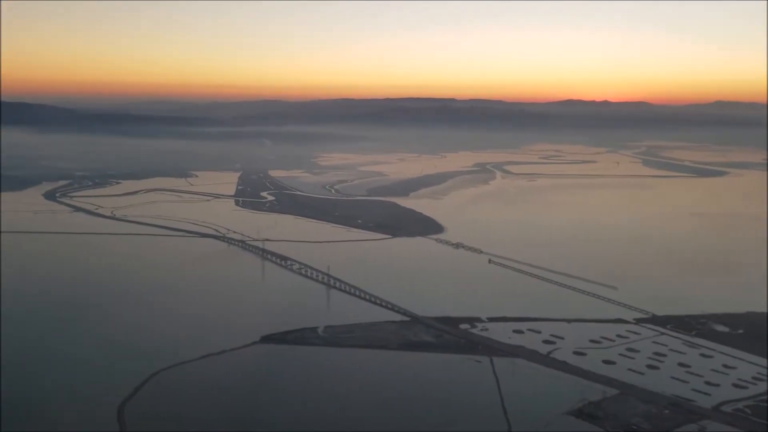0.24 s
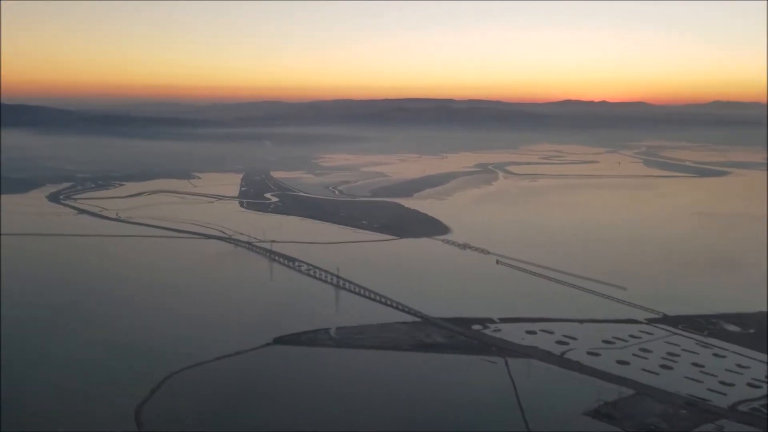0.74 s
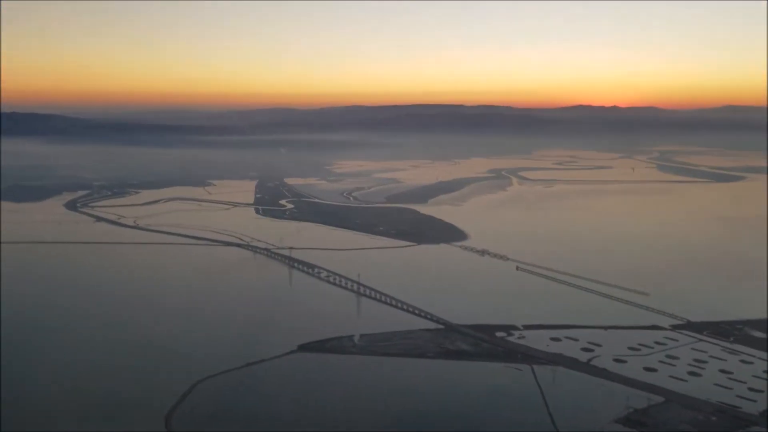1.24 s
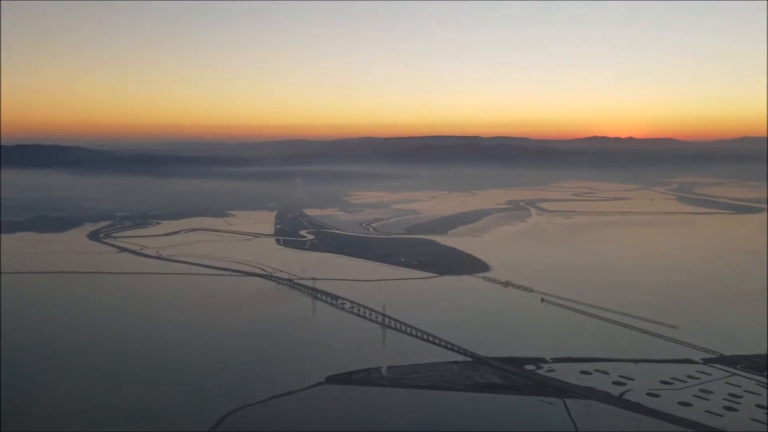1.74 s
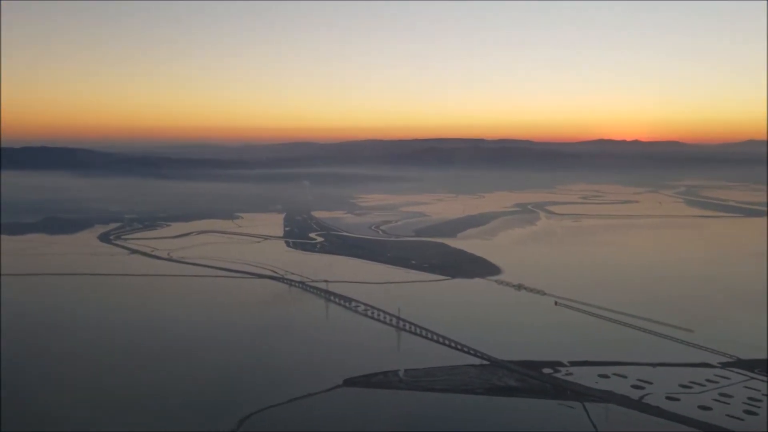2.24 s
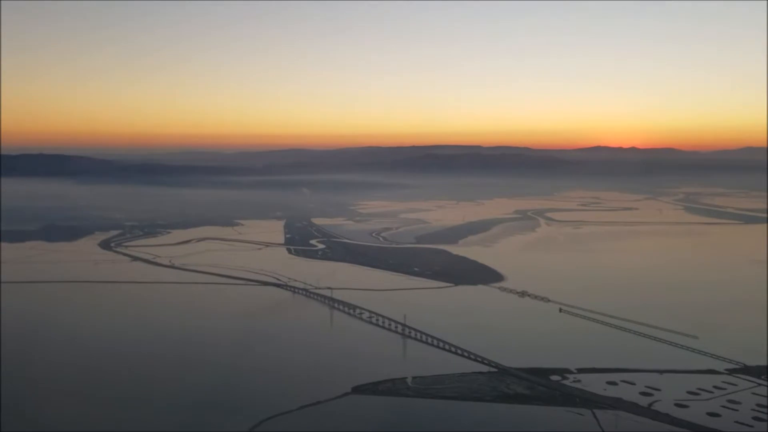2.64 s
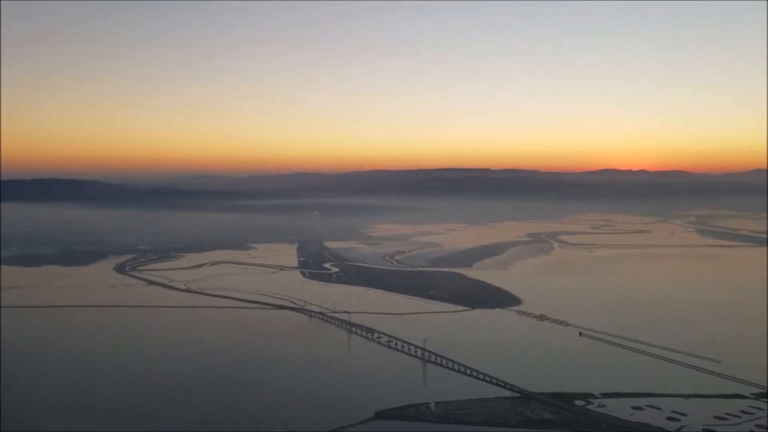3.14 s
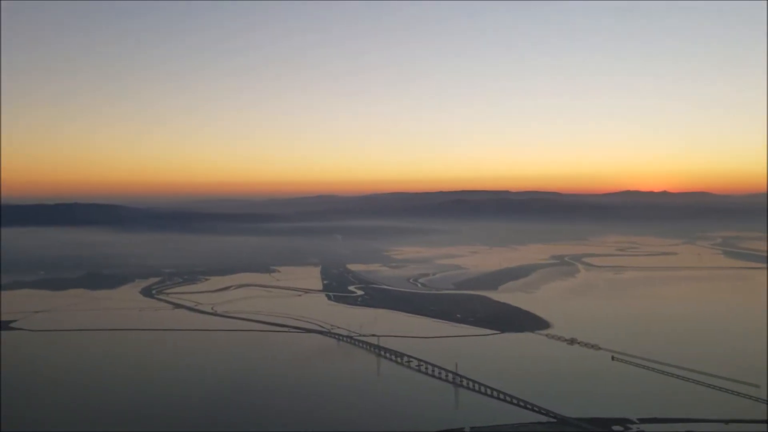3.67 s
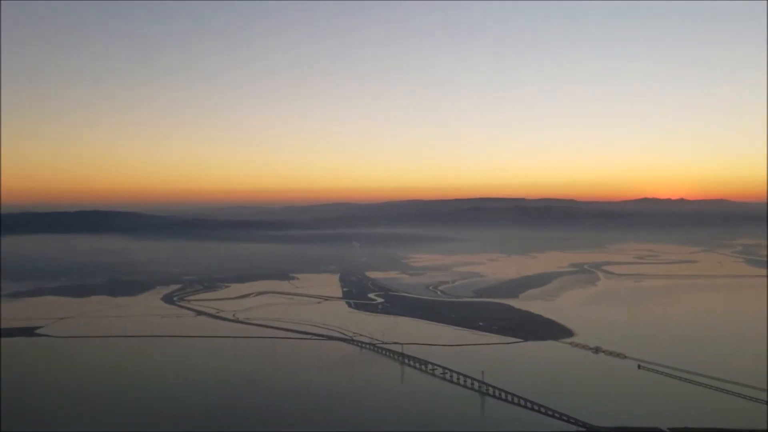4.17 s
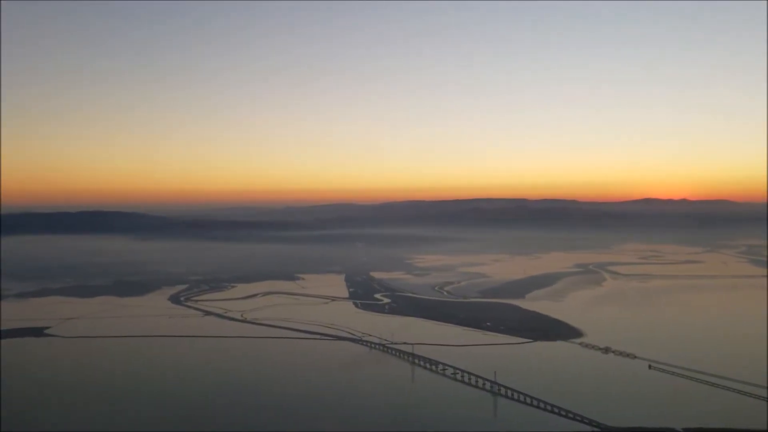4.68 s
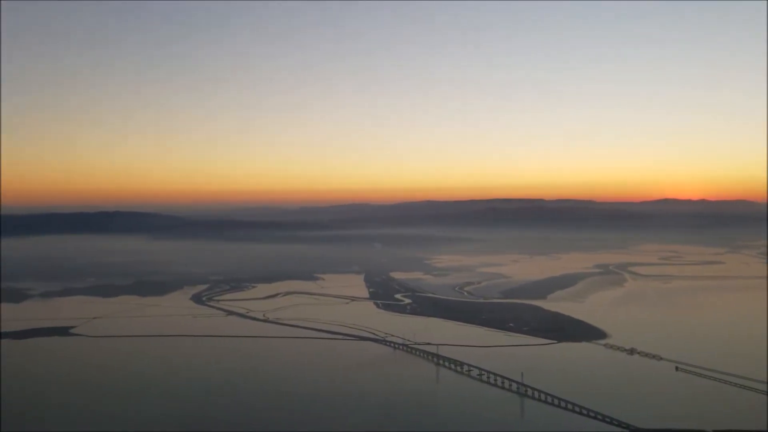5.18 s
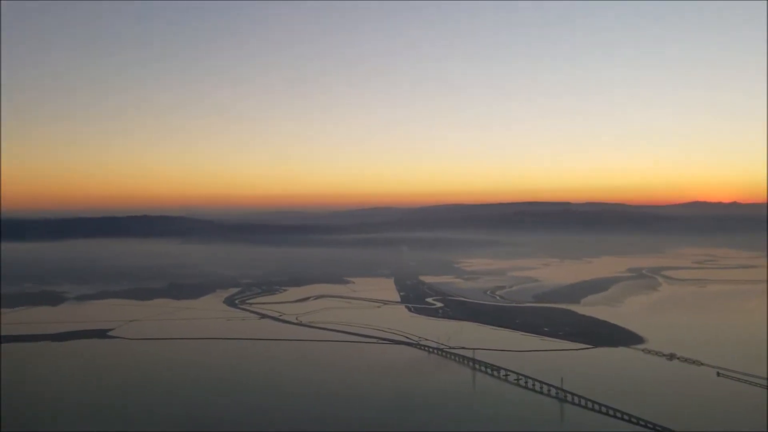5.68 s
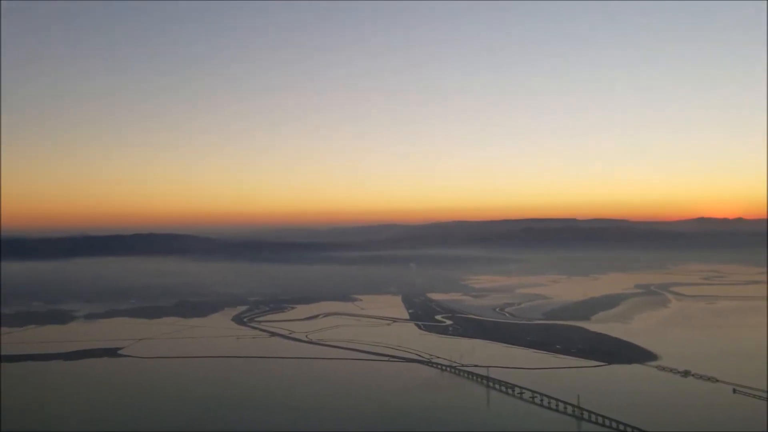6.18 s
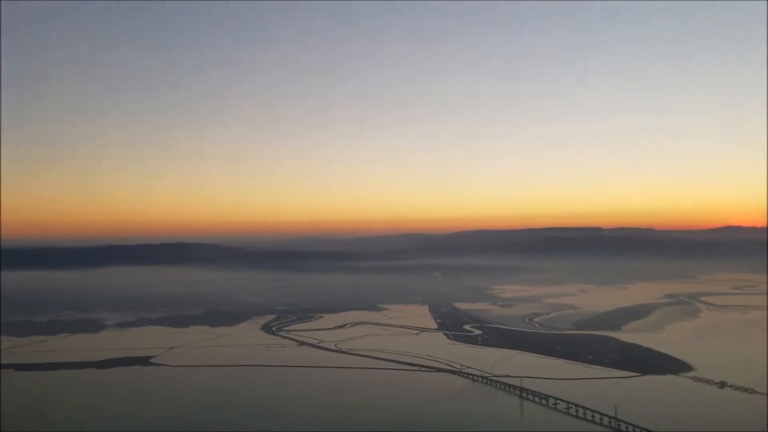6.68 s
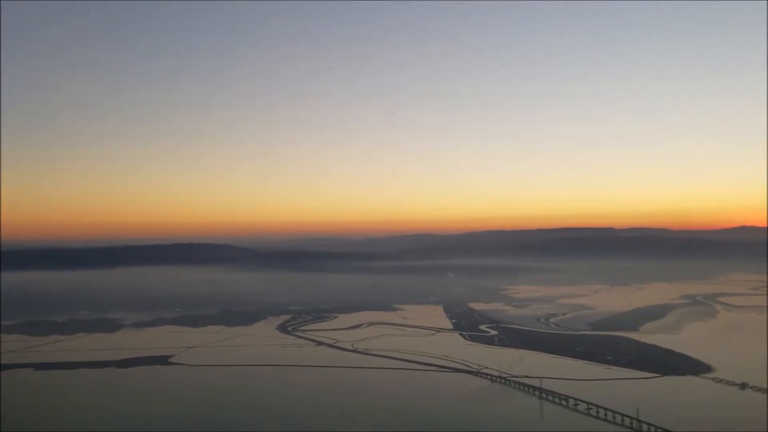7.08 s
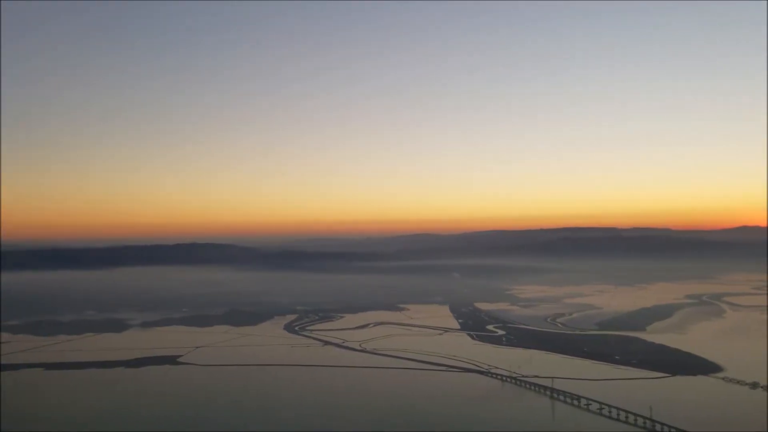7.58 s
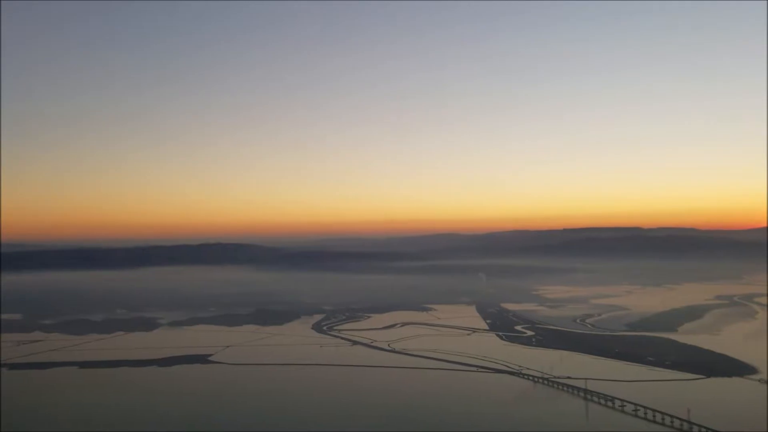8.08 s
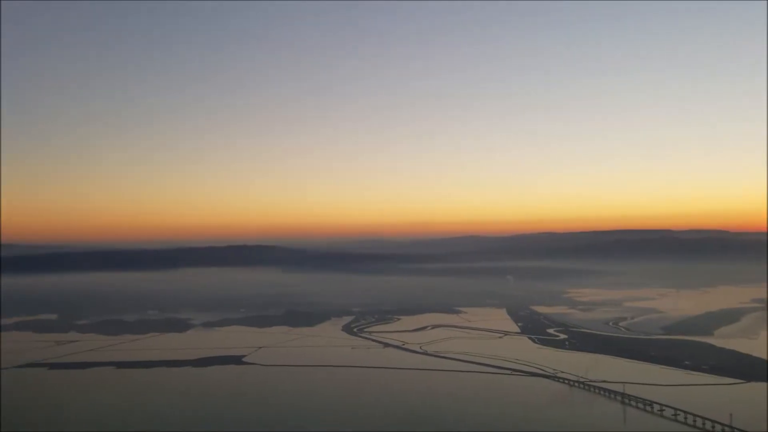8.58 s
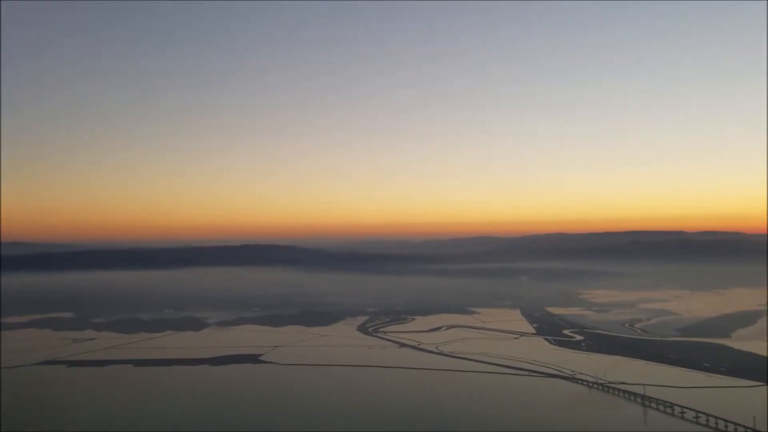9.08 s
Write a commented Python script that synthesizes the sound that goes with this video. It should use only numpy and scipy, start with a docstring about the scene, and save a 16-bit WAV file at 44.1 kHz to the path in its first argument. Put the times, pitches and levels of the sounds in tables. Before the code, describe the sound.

Inside a cruising airliner cabin by the window, a loud low boom swells unevenly over deep rumble, wavering engine hum and soft air rush.

```python
"""The cabin of an airliner in flight, heard close to a window seat, booms in uneven swells on one low resonance.
The boom and a deeper throb are noise rung through sharp cabin modes; the panels' rumble is noise through many.
The engines add a wavering hum and a faint whine as sine tones; air hisses along the window and from the
vents as shaped stereo noise. The camera's limiter turns down any peak that passes full scale."""
import sys
import numpy as np
from scipy import signal
from scipy.fft import rfft, irfft, next_fast_len
from scipy.io import wavfile
from scipy.ndimage import uniform_filter1d, minimum_filter1d, map_coordinates

SR = 44100
rng = np.random.default_rng(int(sys.argv[2]) if len(sys.argv) > 2 else 0)


def dump_mix(stems):
    """Bounce the given channels to the path in sys.argv[1] as a 16-bit WAV at rate SR."""
    frames = np.atleast_2d(stems).T  # one column per channel
    limited = np.clip(frames, -1, 1)  # hard clip at full scale
    pcm = np.round(limited * 32767).astype(np.int16)
    wavfile.write(sys.argv[1], SR, pcm)


N = 411012

# Strength of the airflow over time, before each source's own gain: start_s, rush_db, hiss_db
AIRFLOW_LEVELS = [(0, -36.5, -55.5), (1.7, -35.5, -55.5), (3.5, -36.5, -56.5), (3.75, -37.5, -57.4),
                  (5, -36.5, -56.5), (5.75, -36.5, -56), (6.1, -37.6, -59.5), (7, -37.5, -60.0),
                  (8, -36.5, -59.5), (9.3, -36.5, -59)]


def amp(db):
    """Decibels to gain."""
    return 10 ** (np.asarray(db) / 20)


def unit(x):
    """Scale to rms 1."""
    return x / np.sqrt(np.mean(np.abs(x) ** 2) + 1e-20)


def along(points, hz):
    """Read (frequency, value) points on a logarithmic frequency axis."""
    point_hz, value = np.transpose(points)
    return np.interp(np.log(hz + 1), np.log(point_hz + 1), value)


def curves(rows):
    """One value per sample for each column after the time."""
    knot_s, *columns = np.transpose(rows)
    time_s = np.arange(N) / SR
    return [np.interp(time_s, knot_s, column) for column in columns]


def wobble(rate):
    """A smooth random curve through normally distributed knots, rate of them a second."""
    knots = rng.standard_normal(int(N * rate / SR) + 4)
    return map_coordinates(knots, [np.arange(N) * rate / SR])


def filtered(x, response):
    """Pass x through a response given as a function of frequency."""
    size = next_fast_len(N + SR // 2)  # padded, so that ringing does not wrap to the start
    hz = np.fft.rfftfreq(size, 1 / SR)
    return irfft(rfft(x, size) * response(hz), size)[..., :N]


def bell(hz, centre_hz, width_hz):
    """Magnitude of one resonance, 1 at its centre."""
    return hz * width_hz / np.hypot(centre_hz ** 2 - hz ** 2, hz * width_hz)


def colour(spectrum, modes, hz):
    """Gain of a broad spectrum with resonances standing on it."""
    raised_db = sum(db * bell(hz, centre, width) ** 2 for centre, width, db in modes)
    return amp(along(spectrum, hz) + raised_db)


def even(x, seconds):
    """Noise with its swells slower than the given time smoothed away, rms 1."""
    size = max(int(seconds * SR), 1)
    power = np.abs(signal.hilbert(x, next_fast_len(N))[:N]) ** 2
    slow_power = uniform_filter1d(uniform_filter1d(power, size), size)
    return unit(x / np.sqrt(np.abs(slow_power) + 1e-12))


def gate(t, length, rise_s, fall_s):
    """Rise, hold and fall between 0 and 1, half open at t = 0 and at t = length."""
    return np.clip(.5 + np.minimum(t / rise_s, (length - t) / fall_s), 0, 1)


def cabin_mode(level_db, centre_hz, width_hz, skirt_hz, settle_s):
    """Turbulence drives one sharp standing wave in the cabin, which swells and fades unevenly."""
    noise = rng.standard_normal(N)
    # the wider second bell steepens the skirts of the resonance
    ring = filtered(noise, lambda hz: bell(hz, centre_hz, width_hz) * bell(hz, centre_hz, skirt_hz))
    return amp(level_db) * even(ring, settle_s)


def boom_level():
    """The boom beats at random, in dB; each strong swell rises out of a lull, holds and falls into another."""
    # Strong swells of the boom, level before the crest is added: start_s, length_s, level_db
    swell_rows = [(0.022, 0.11, -10.5), (0.175, 0.09, -10.5), (0.35, 0.14, -8.5), (0.831, 0.066, -11),
                  (1.098, 0.05, -10), (1.412, 0.04, -10.5), (1.513, 0.05, -8), (1.72, 0.06, -8.5),
                  (2.229, 0.12, -10.5), (2.537, 0.045, -10.5), (2.602, 0.064, -9.5), (2.676, 0.07, -9),
                  (2.814, 0.045, -10), (2.935, 0.28, -7), (3.62, 0.11, -8), (3.919, 0.07, -9),
                  (4.078, 0.2, -10), (5.061, 0.05, -7.5), (5.153, 0.09, -11), (5.419, 0.044, -7.5),
                  (5.841, 0.07, -8), (6.051, 0.1, -6), (6.402, 0.1, -9.5), (6.93, 0.069, -9.0),
                  (7.019, 0.05, -9), (7.365, 0.08, -8), (7.51, 0.09, -10.5), (7.669, 0.083, -7.0),
                  (8.075, 0.054, -9.0), (8.212, 0.15, -9.5), (8.544, 0.046, -9.0), (8.711, 0.07, -10.0),
                  (8.929, 0.21, -8.5)]
    rise_s, fall_s = .026, .03
    crest_db = 0.9  # added at the top of every swell
    # on either side of a swell the boom sinks by this share of the swell's height
    lull_share, lull_s = 0.61, .06
    base_db, beat_db, beat_rate = -14, 3.5, 24  # between swells; random knots a second

    t = np.arange(N) / SR
    lull_db, swell, peak_db = np.zeros((3, N))
    for start, length, db in swell_rows:
        near = slice(*np.searchsorted(t, [start - .5, start + length + .5]))
        since = t[near] - start
        around = gate(since + lull_s, length + 2 * lull_s, fall_s, rise_s)
        lull_db[near] = np.maximum(lull_db[near], lull_share * (db - base_db) * around)
        shape = gate(since, length, rise_s, fall_s)
        # where swells overlap, the more open one sets the level
        peak_db[near] = np.where(shape > swell[near], db, peak_db[near])
        swell[near] = np.maximum(swell[near], shape)
    between_db = base_db + beat_db * wobble(beat_rate) - lull_db
    return between_db + swell * (peak_db + crest_db - between_db)


def boom():
    """The loudest standing wave of the cabin, a narrow low resonance driven by turbulence."""
    return cabin_mode(boom_level(), centre_hz=127.5, width_hz=5.9, skirt_hz=34, settle_s=0.021)


def throb():
    """The deepest cabin mode rises and falls slowly, with a quicker random swing on top."""
    # Slow course of the throb, before its random swing: start_s, level_db
    throb_rows = [(0, -33), (0.6, -37.0), (0.9, -31.5), (1.4, -32), (2.4, -33.5), (3.1, -28), (3.7, -38.5),
                  (4.3, -29.5), (5.1, -30), (5.9, -37.0), (6.3, -33.5), (7.35, -31.5), (7.7, -37.5),
                  (8.3, -30.5), (9.3, -30)]
    swing_db, swing_rate = 2, 9  # random knots a second
    level_db = curves(throb_rows)[0] + swing_db * wobble(swing_rate)
    return cabin_mode(level_db, centre_hz=49.8, width_hz=7.5, skirt_hz=25, settle_s=0.26)


def rumble(gain_db):
    """The fuselage panels roar with the airflow; waves this long reach both microphones alike."""
    # Broad rumble of the fuselage, relative spectrum: frequency_hz, density_db_per_hz
    roar_spectrum = [(10, -52.5), (22, -33.5), (36, -22), (62, -13.5), (85, -4.5), (120, 0.5), (155, 3),
                     (190, -3.5), (232, -8), (335, -7.5), (365, -13), (430, -16), (540, -29.5), (800, -62)]
    # Cabin and panel resonances, height over the broad rumble: centre_hz, width_hz, height_db
    panel_modes = [(83, 14, 2.5), (160, 14, 0.5), (210.3, 24, 5), (245, 11, 6.5), (283.8, 31.6, 10.5),
                   (325.4, 33, 10), (445, 34, 1), (480, 18, 2.5)]
    swing_db, swing_rate = 0.76, 5  # the panels' own swings; random knots a second
    rush_db, _ = curves(AIRFLOW_LEVELS)
    roar = filtered(rng.standard_normal(N), lambda hz: colour(roar_spectrum, panel_modes, hz))
    level_db = rush_db + gain_db + swing_db * wobble(swing_rate)
    return amp(level_db) * even(roar, seconds=0.58)


def engines(flutter_db):
    """Shaft tones waver in pitch and strength on their way through the wall."""
    # Engine hum and whine, rms level: pitch_hz, level_db, pitch_wander_hz, left_right_phase_rad
    tone_rows = [(310, -26.5, 0.81, 0.066), (887, -54.5, 3.5, -.3)]
    out = np.zeros((2, N))
    for hz, db, wander_hz, spread in tone_rows:
        phase = 2 * np.pi * np.cumsum(hz + wander_hz * wobble(6)) / SR
        flutter = amp(flutter_db * wobble(6.5))
        tone = flutter * np.sin([phase + spread / 2, phase - spread / 2])
        out += amp(db) * unit(tone)
    return out


def air_noise(spectrum, modes):
    """Stereo turbulence of rms 1, only partly alike at the two microphones."""
    # Left-right likeness of the air noise, negative where opposed: frequency_hz, coherence
    likeness = [(350, 0.36), (660, -0.37), (810, -.2), (890, 0.075), (1180, .2), (1480, -.42),
                (1750, -0.15), (1980, 1), (2100, 0.43), (2250, .2), (2650, 0.076), (3700, .2),
                (5500, -0.18), (15000, -0.5)]

    def mid_side_gains(hz):
        # the split of power between mid and side sets the coherence
        turn = np.arccos(np.clip(along(likeness, hz), -1, 1)) / 2
        return colour(spectrum, modes, hz) * [np.cos(turn), np.sin(turn)]

    mid, side = filtered(rng.standard_normal((2, N)), mid_side_gains)
    return unit(np.array([mid + side, mid - side]))


def airflow(rush_gain_db, hiss_gain_db, flutter_db):
    """Rush along the window and fine hiss, both stirred by the same eddies."""
    # Air rushing past the window, relative spectrum: frequency_hz, density_db_per_hz
    rush_spectrum = [(30, -1.5), (100, 6), (250, 10), (400, 9.5), (560, 3), (820, 3), (1030, -3),
                     (1750, -5), (2400, -7), (3450, -12), (4200, -16.5), (5300, -17.5), (7500, -31),
                     (15000, -55)]
    # Vent and trim resonances, height over the rush: centre_hz, width_hz, height_db
    vent_modes = [(894, 55, 1.5), (1956, 73, 5), (2066, 60, 7), (3420, 140, 3), (3850, 120, 3.5)]
    # Fine hiss, relative spectrum: frequency_hz, density_db_per_hz
    hiss_spectrum = [(2000, -14.5), (6000, 0.5), (7600, -1), (9000, 0), (11200, 0), (12500, 1.5),
                     (13900, -1.5), (15700, -15)]
    rush_db, hiss_db = curves(AIRFLOW_LEVELS)
    rush = amp(rush_db + rush_gain_db) * air_noise(rush_spectrum, vent_modes)
    hiss = amp(hiss_db + hiss_gain_db) * air_noise(hiss_spectrum, [])
    return (rush + hiss) * amp(flutter_db * wobble(14))


def window_side(cabin):
    """The nearby window favours one microphone or the other by frequency."""
    # Left minus right level: frequency_hz, difference_db
    side_balance = [(50, 0.5), (125, 1), (200, 2), (310, -2.5), (450, -4.5), (570, -8), (800, 4), (1300, 1),
                    (2000, 1), (3300, 3.5), (5500, 1), (9000, -1), (15000, 1)]
    return filtered(cabin, lambda hz: amp(np.outer([.5, -.5], along(side_balance, hz))))


def scene():
    """All of the cabin as it reaches the two microphones beside the window."""
    low = boom() + throb() + rumble(gain_db=19.5)  # the same in both channels
    hum_and_whine = engines(flutter_db=3.0)
    air = airflow(rush_gain_db=3.4, hiss_gain_db=0.84, flutter_db=0.53)
    return window_side(low + hum_and_whine + air)


def limiter(x, ceiling, hold_s):
    """The gain of both channels drops just before a peak and comes back after a short hold."""
    size = max(int(hold_s * SR), 1)
    needed = np.minimum(1, ceiling / (np.abs(x).max(axis=0) + 1e-9))
    return x * uniform_filter1d(minimum_filter1d(needed, size), size)


def record(dry):
    """The camera holds peaks at full scale, then keeps nothing above its band limit."""
    top_hz = 15750
    held = limiter(dry, ceiling=1, hold_s=.03)
    return filtered(held, lambda hz: hz < top_hz)


dry = scene()
out = record(dry)
dump_mix(out)
```